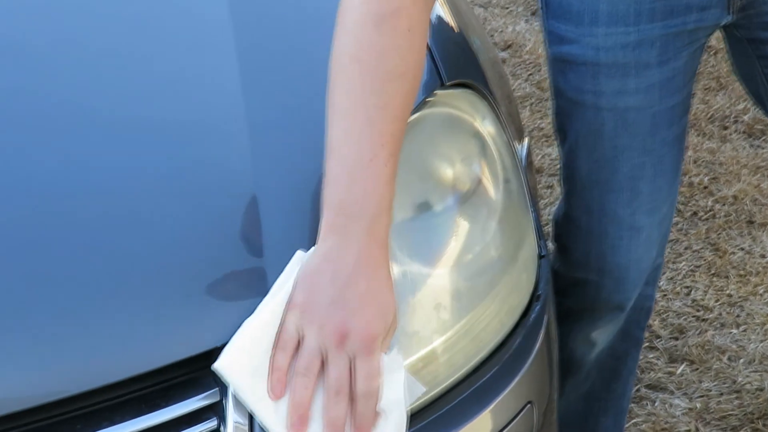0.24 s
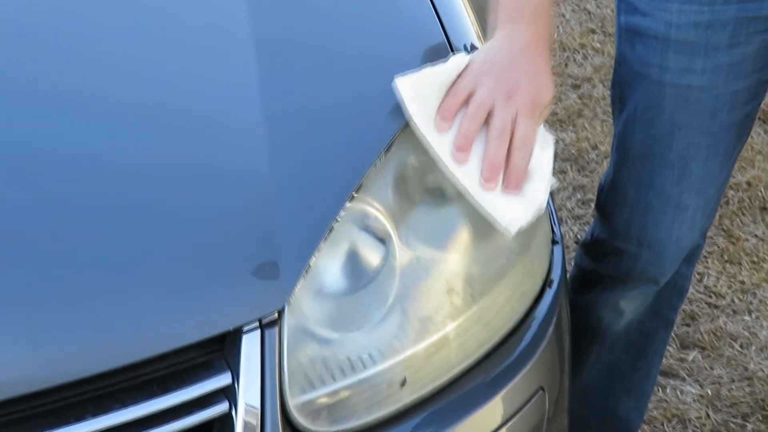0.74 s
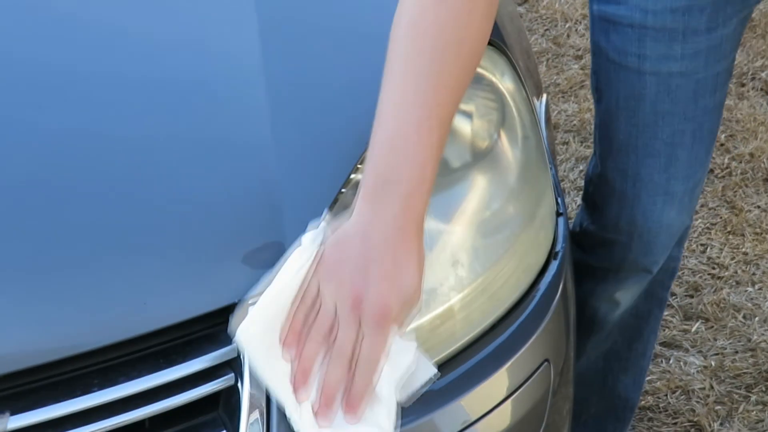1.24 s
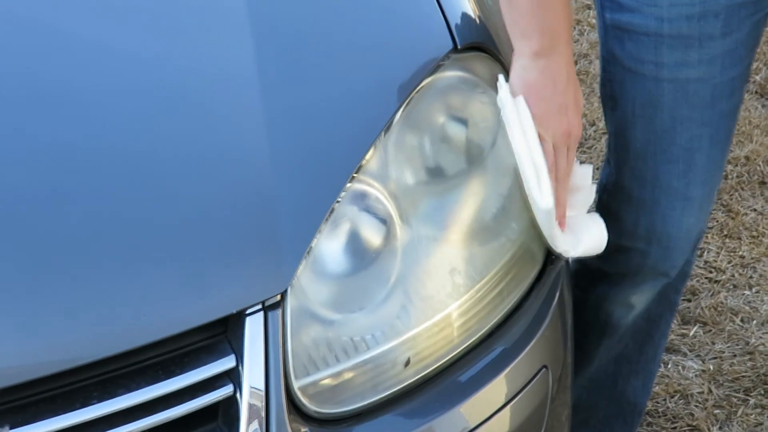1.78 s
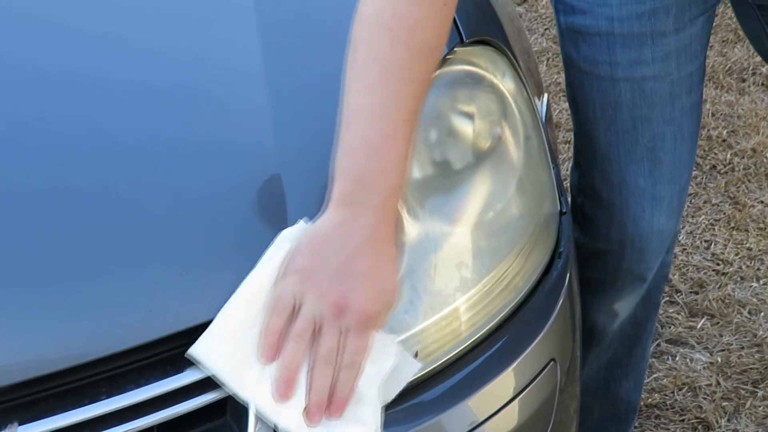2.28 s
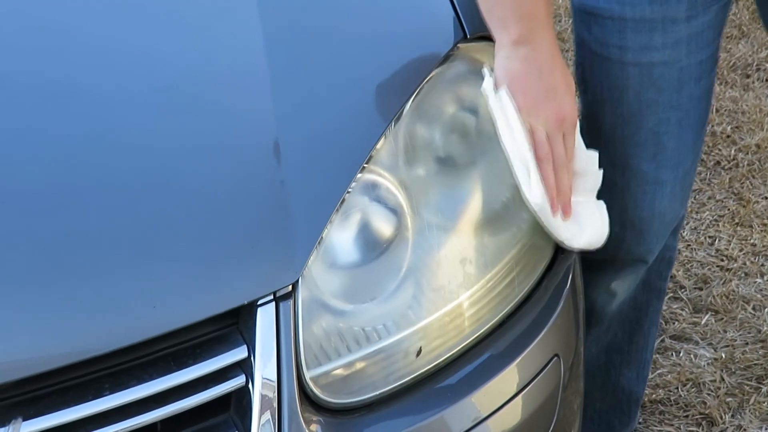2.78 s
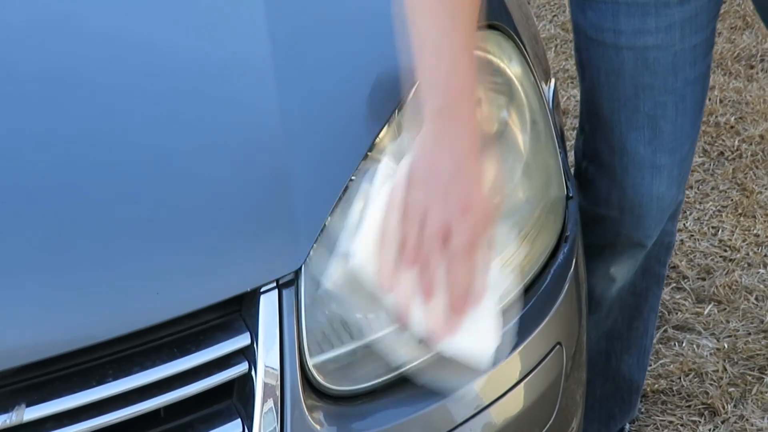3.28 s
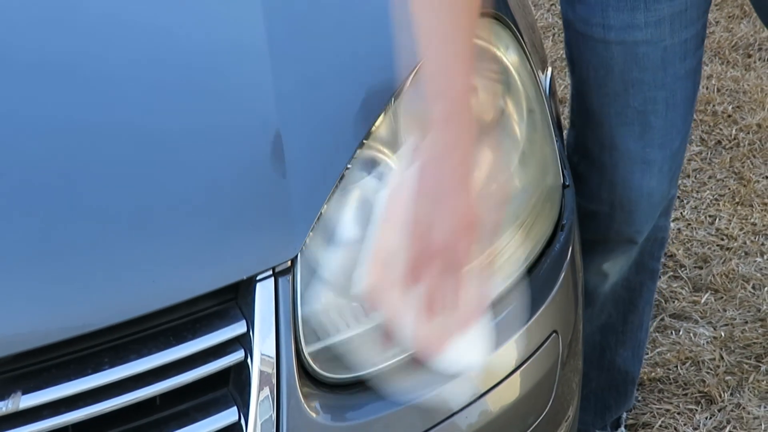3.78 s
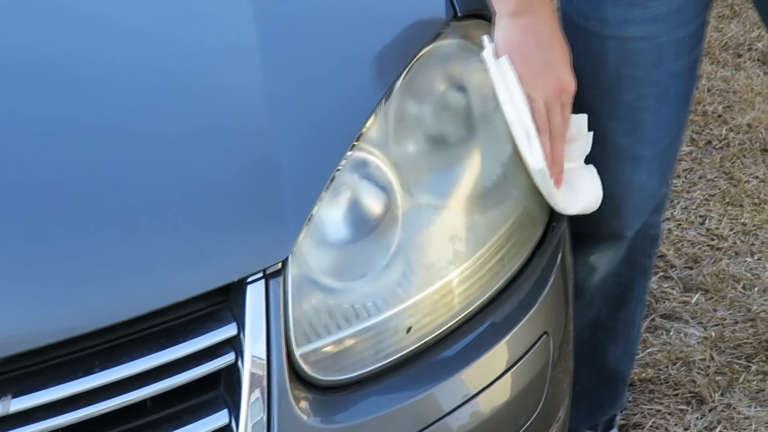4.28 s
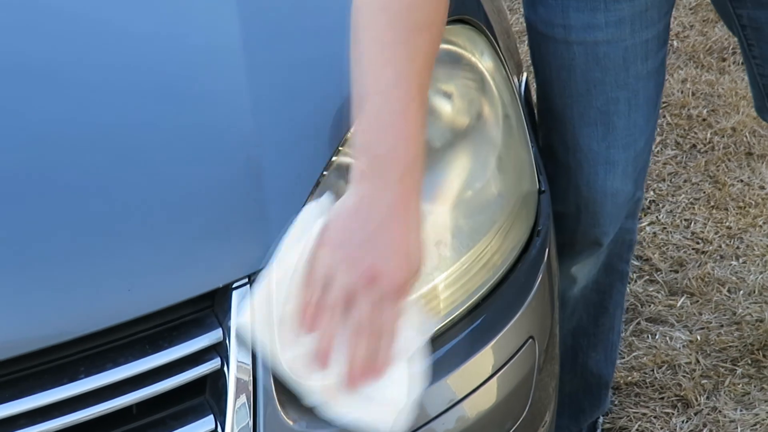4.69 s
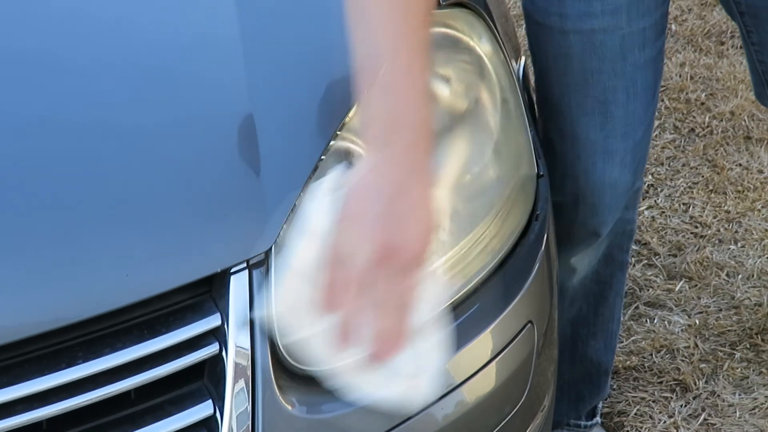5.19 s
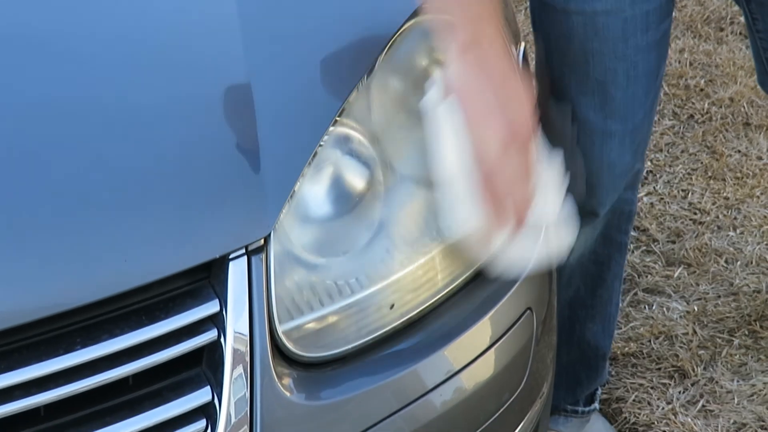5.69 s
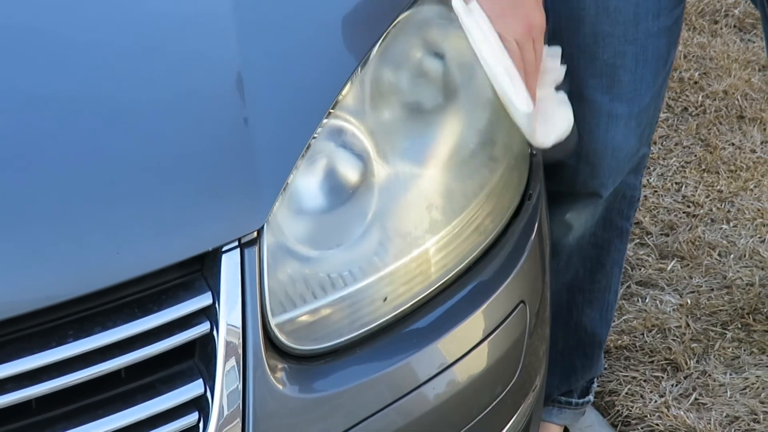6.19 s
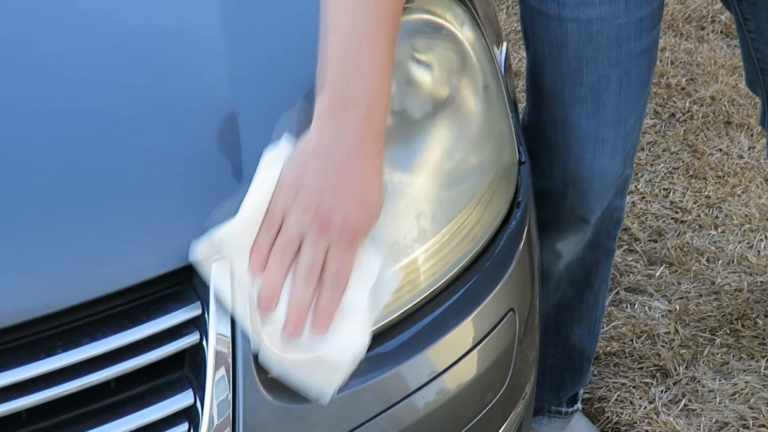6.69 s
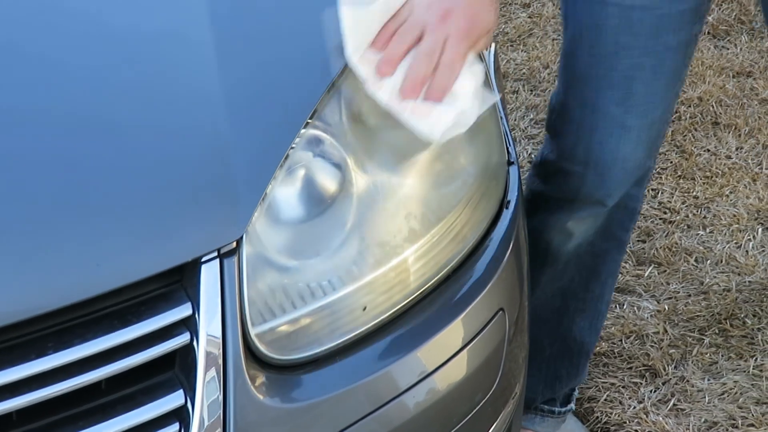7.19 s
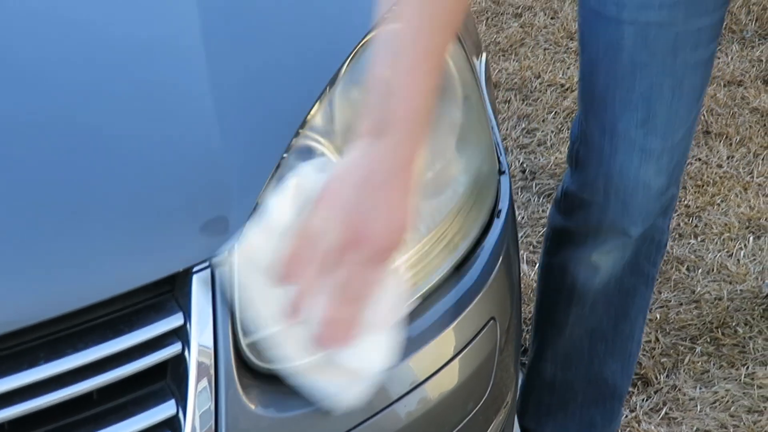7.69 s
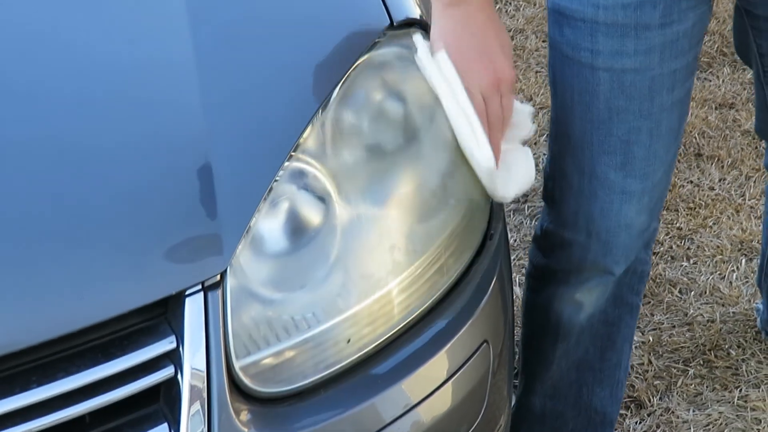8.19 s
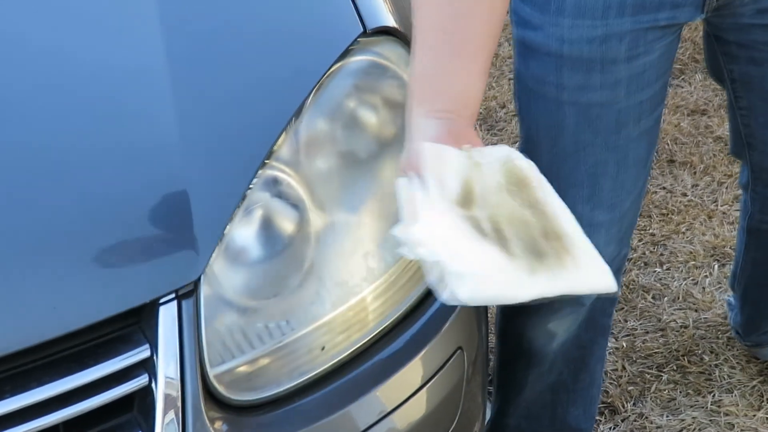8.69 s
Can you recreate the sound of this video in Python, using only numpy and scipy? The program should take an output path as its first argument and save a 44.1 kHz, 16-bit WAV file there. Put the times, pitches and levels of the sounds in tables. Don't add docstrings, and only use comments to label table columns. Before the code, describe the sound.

Dry paper scrubs rhythmically over a hollow plastic lamp lens, with light ticks and faint squeaks, under low, fluttering gusts of wind on the microphone.

```python
import sys
import numpy as np
from scipy import signal
from scipy.fft import rfft, irfft, next_fast_len
from scipy.io import wavfile
from scipy.ndimage import uniform_filter1d

SR = 44100
rng = np.random.default_rng(int(sys.argv[2]) if len(sys.argv) > 2 else 0)


def undo_db(level):
    steps = np.asarray(level, float) / 20
    return 10 ** steps


def persist_wave(psi):
    counts = np.round(np.clip(psi, -1, 1) * 32767).astype(np.int16)
    wavfile.write(sys.argv[1], SR, np.atleast_2d(counts).T)


N = 394606


def curve(table):
    s, *columns = np.transpose(table)
    return [np.interp(np.arange(N) / SR, s, c) for c in columns]


def unit(x):
    return x / np.sqrt(np.mean(x ** 2))


def colour(x, points):
    hz, db = np.transpose(points)
    size = next_fast_len(N)
    f = np.maximum(np.arange(size // 2 + 1) * SR / size, 1)
    gain = undo_db(np.interp(np.log(f), np.log(hz), db))
    return irfft(rfft(x, size) * gain, size)[:N]


def ring(x, hz, width_hz):
    return signal.lfilter(*signal.iirpeak(hz, hz / width_hz, SR), x)


def walk(rate):
    k = int(SR / rate)
    held = np.repeat(rng.standard_normal(N // k + 1), k)
    return unit(uniform_filter1d(uniform_filter1d(held, k), k)[:N])


def grains(rate, spread_db):
    hit = rng.random(N) < rate / SR
    size = np.minimum(rng.exponential(size=N), 3)
    return unit(hit * undo_db(spread_db * size) * rng.standard_normal(N))


def add(out, at_s, burst):
    i = max(int(at_s * SR), 0)
    out[i:i + len(burst)] += burst[:N - i]


def swell(s, length, db, tail=1):
    out = np.zeros(N)
    t = np.arange(max(-2 * length, -s) * SR, 2 * length * tail * SR) / SR
    stretch = np.where(t > 0, tail, 1)
    add(out, s + t[0], undo_db(db) ** 2 * np.exp(-(2 * t / length / stretch) ** 2))
    return out


def dips(rows):
    return undo_db(sum(db * swell(s, length, 0) for s, length, db in rows))


# (start [s], length [s],
# fibre hiss at full speed [dB], share of the stroke at which speed crests [0-1], lens shell [dB])
STROKE_ROWS = [(-0.272, 0.5, -44, 0.61, -47), (0.207, 0.62, -49.5, 0.11, -57.5),
               (0.853, 0.44, -48, 0.21, -55), (1.324, 0.49, -41.5, 0.75, -47.5),
               (1.792, 0.46, -43, 0.39, -55), (2.294, 0.39, -42.5, 0.7, -47.5),
               (2.693, 0.48, -44.0, 0.36, -51), (3.158, 0.38, -43, 0.71, -47),
               (3.519, 0.41, -43.5, 0.39, -49), (3.933, 0.35, -42.5, 0.85, -47),
               (4.288, 0.37, -43, 0.4, -50), (4.657, 0.32, -42, 0.86, -48),
               (4.975, 0.33, -41.5, 0.33, -51.5), (5.298, 0.3, -41.5, 0.59, -46.5),
               (5.582, 0.3, -42, 0.31, -51.5), (5.882, 0.37, -42.5, 0.54, -46),
               (6.179, 0.29, -52, 0.58, -53), (6.389, 0.42, -49.5, 0.53, -54.5),
               (6.808, 0.73, -50, 0.12, -54.5), (7.385, 0.41, -45.5, 0.62, -51.5),
               (7.796, 0.43, -49, 0.18, -57.5), (8.087, 0.1, -46, 0.17, -49),
               (8.02, 0.4, -56.5, 0.55, -56.5), (8.476, 0.186, -69, 0.61, -67)]
# (crest [s], length [s], hiss [dB])
PAPER_DRAGS = [(0.79, .04, -52.5), (0.92, 0.046, -52), (1.196, 0.14, -47.5), (3.59, .04, -60),
               (8.34, 0.071, -52.5), (8.412, 0.026, -58), (8.722, .008, -68), (8.767, .006, -68),
               (8.876, .006, -70)]
# (crest [s], length [s], shell [dB])
RIM_SCRAPES = [(0.41, 0.16, -50.5), (0.777, 0.045, -50.5), (1.228, 0.18, -48.5), (1.738, 0.057, -51),
               (1.971, 0.14, -44), (2.186, 0.099, -52), (2.653, 0.039, -48), (2.871, 0.11, -49),
               (3.105, 0.25, -52.5), (3.698, 0.071, -46.5), (4.46, 0.11, -47.5), (5.104, 0.1, -45.5),
               (5.693, 0.093, -48), (5.951, 0.019, -45), (6.17, 0.042, -51), (6.335, 0.039, -53),
               (6.859, 0.24, -51), (7.568, 0.089, -46.5), (7.917, 0.13, -50)]
# (time [s], length [s], hiss change [dB],
# shell change [dB])
BRIEF_DIPS = [(0.234, 0.017, -10, -14), (0.28, 0.12, -13, 2), (5.303, 0.014, 4, -9), (0.86, .025, -6, 2),
              (1.327, 0.028, -12, -14), (2.694, 0.027, -2, -6), (3.148, 0.03, -8, -10),
              (3.52, 0.03, -27, -6), (6.82, 0.038, 3, -13), (7.392, .06, -2, -5), (8.367, .035, -6, -2.5),
              (2.242, 0.022, -1, -8), (4.274, .014, -6, -2), (5.0, .06, -1, -0.5), (5.601, .014, -6, -14),
              (6.23, 0.033, -3, -6), (7.8, .03, 6, -1), (3.14, 0.011, -7, 0), (3.1, 0.054, -2, -3.5),
              (1.5, .012, 0, -9), (4.4, .012, 0, -8), (2.3, .05, -1, -4), (3.535, .03, -1, -5),
              (1.825, .02, -1, -3), (.19, .06, .5, -2.5), (3.7, .05, 0, -2)]
PICKUP, GRIP = (0.4, 2.53), (0.93, 1.59)
STOP = (2.66, 4.8)
HISS_CREEP_DB, SHELL_CREEP_DB = -74, -70.5
SHELL_BY_SPEED, SHELL_RISE_DB = 0.28, 3.5


def hand():
    hiss = sum(swell(*row) for row in PAPER_DRAGS) + undo_db(HISS_CREEP_DB) ** 2
    shell = sum(swell(*row) for row in RIM_SCRAPES) + undo_db(SHELL_CREEP_DB) ** 2
    for k, (s, length, hiss_db, crest, shell_db) in enumerate(STROKE_ROWS):
        up = k % 2
        part = np.arange(max(-s, 0) * SR, length * SR) / (length * SR)
        rising = (1 - np.clip(1 - part / crest, 0, 1) ** PICKUP[up]) ** GRIP[up]
        halting = 1 - np.clip((part - crest) / (1 - crest), 0, 1) ** STOP[up]
        speed = rising * halting
        add(hiss, s, (undo_db(hiss_db) * speed) ** 2)
        shell_level = undo_db(shell_db + SHELL_RISE_DB * (part - 0.5))
        add(shell, s, (shell_level * speed ** SHELL_BY_SPEED) ** 2)
    hiss_dips = dips((s, length, db) for s, length, db, _ in BRIEF_DIPS)
    shell_dips = dips((s, length, db) for s, length, _, db in BRIEF_DIPS)
    return np.sqrt(hiss) * hiss_dips, np.sqrt(shell) * shell_dips


# (frequency [Hz], density [dB per Hz])
FIBRE_COLOUR = [(2060, -75), (3500, -6), (4380, -5), (5030, -5), (7310, -2.5), (12100, 2), (13400, 1),
                (15500, -10.5)]
# (frequency [Hz], width [Hz], level [dB])
LENS_MODES = [(1544, 214, -1.5), (2236, 460, 2), (2777, 704, 4), (3345, 1145, -1)]
# (frequency [Hz], width [Hz], level [dB])
PAPER_TONES = [(1230, 60, -9), (1898, 87, -9), (3037, 52, -9), (4270, 135, -15), (4760, 120, -18.5)]
PATCHY_DB = 0.7


def rubbing(hiss_gain, shell_gain):
    catches = grains(24000, spread_db=0.5) * undo_db(0.5 * walk(90) + 0.5 * walk(17))
    shell = np.zeros(N)
    for k, (hz, width_hz, db) in enumerate(LENS_MODES):
        shell -= (-1) ** k * undo_db(db + PATCHY_DB * walk(13)) * ring(catches, hz, width_hz)
    for hz, width_hz, db in PAPER_TONES:
        shell += undo_db(db + 3.5 * walk(30)) * ring(catches, hz, width_hz)
    hiss = unit(colour(catches, FIBRE_COLOUR))
    return undo_db(0.94) * hiss_gain * hiss + shell_gain * undo_db(1.03 + 0.9 * walk(25)) * unit(shell)


# (time [s], level [dB])
HAND_WEIGHT = [(.9, -62), (1.4, -53.5), (2, -60), (3, -50.5), (3.67, -51), (4.5, -52), (6.3, -53.5),
               (7.1, -59), (7.5, -55), (8.5, -52.5)]
# (crest [s], length [s], level [dB])
HARD_LEANS = [(1.361, 0.025, -48), (1.72, .08, -55), (1.979, 0.15, -49), (2.202, 0.055, -48.5),
              (2.605, 0.045, -47.5), (2.826, 0.066, -52.5), (3.664, 0.018, -41), (4.402, 0.054, -48),
              (6.34, 0.18, -50.5), (6.54, 0.034, -58), (6.758, 0.025, -50), (6.832, 0.022, -43.5),
              (7.513, 0.032, -47.5), (8.45, 0.011, -51.5), (5.354, .08, -54), (3.826, .06, -56)]


def housing(shell_gain):
    drag = grains(3000, spread_db=1.5) * undo_db(1.2 * walk(20))
    steady = undo_db(curve(HAND_WEIGHT)[0] + 29.5) * shell_gain ** 0.66
    gain = np.sqrt(steady ** 2 + sum(swell(*row) for row in HARD_LEANS))
    return gain * unit(ring(drag, 745.0, 540.0) - ring(drag, 955.0, 800.0))


# (time [s], peak [dB], ring [Hz], t60 [s], snap [dB])
TRIM_TICKS = [(3.637, -47, 1770, 0.05, 1), (6.638, -26, 1020, 0.07, 10), (6.75, -36, 2800, 0.15, 6),
              (6.8255, -26.5, 1760, 0.11, 7), (6.829, -32, 2900, .12, 3), (6.838, -34, 1000, 0.07, 10),
              (7.521, -27, 2860, 0.04, 6), (8.4425, -39.5, 1450, 0.045, 2), (8.5495, -32, 1620, 0.035, 1),
              (1.372, -42, 1500, .03, -3), (8.92, -55, 3500, .06, 2)]


def ticks():
    out, t = np.zeros(N), np.arange(int(0.08 * SR)) / SR
    for s, db, hz, t60, snap_db in TRIM_TICKS:
        rattle = rng.standard_normal(len(t)) * np.exp(-np.log(1000) * t / t60)
        rattle[:6] += 7.5
        snap = ring(ring(rattle, 1900.0, 3200.0), 1900.0, 3200.0)
        burst = undo_db(14.5) * ring(rattle, hz, 200.0) + undo_db(snap_db) * snap
        add(out, s, undo_db(db) * burst / np.abs(burst).max())
    return out


# (start [s], length [s], from [Hz], to [Hz], level [dB])
PAPER_SQUEAKS = [
    (1.92, .12, 790, 930, -59),
    (2.175, .145, 905, 865, -58.5),
    (3.075, .055, 1330, 1430, -52),
    (3.135, .065, 1450, 1330, -50.5),
    (3.075, .03, 1215, 1195, -55),
    (3.065, .055, 1810, 1815, -51.5),
    (1.452, .02, 2800, 3000, -52),
    (1.395, .022, 4200, 4250, -55),
    (4.275, .065, 2350, 2345, -56),
]


def squeaks():
    out, waver = np.zeros(N), 1 + 0.013 * walk(90)
    for s, length, from_hz, to_hz, db in PAPER_SQUEAKS:
        n = int(length * SR)
        hz = np.linspace(from_hz, to_hz, n) * waver[int(s * SR):][:n]
        tone = np.sqrt(2) * np.sin(2 * np.pi * np.cumsum(hz) / SR)
        add(out, s, undo_db(db) * tone * np.hanning(n) ** 0.5)
    return out * undo_db(2.5 * walk(70))


# (time [s], level [dB])
TOWEL_SWING = [(8.6, -75), (8.64, -62), (8.65, -46), (8.66, -46), (8.672, -48), (8.7, -45.5), (8.718, -47),
               (8.726, -55), (8.8, -63), (8.95, -67)]


def flap():
    gate = np.arange(N) / SR > TOWEL_SWING[0][0]
    puff_colour = [(300, -19), (480, -2), (700, 0), (980, -9.5), (1200, -25), (2500, -56)]
    puff = unit(colour(rng.standard_normal(N), puff_colour))
    return gate * undo_db(curve(TOWEL_SWING)[0] + 1.2 * walk(60)) * puff


# (time [s], level [dB])
BREEZE_FLOW = [(0.0, -34.5), (0.6, -37), (1.19, -56), (1.79, -49), (2.39, -50.5), (2.98, -62), (3.58, -51),
               (4.18, -36), (4.77, -50.5), (5.37, -50.5), (5.97, -46), (6.56, -68), (7.16, -36),
               (7.76, -59), (8.35, -47), (8.95, -64)]
# (crest [s], length [s], level [dB], small eddies minus large [dB])
GUST_ROWS = [(0.153, 0.089, -21.5, -1.5), (0.281, 0.05, -27, 9.5), (0.483, 0.055, -29.5, 6.5),
             (0.684, 0.034, -26, 8.5), (0.766, 0.017, -30.5, 8), (1.278, 0.027, -31.5, -9.5),
             (1.928, 0.044, -31.5, -13), (2.529, 0.027, -32, -7.5), (3.528, 0.034, -39.5, -5),
             (3.771, 0.04, -38, 1.5), (3.916, 0.045, -28.5, 0.2), (4.152, 0.0077, -26.5, -9),
             (4.207, 0.029, -26, -6.5), (4.294, 0.079, -36, -8), (4.467, 0.035, -31.5, -7),
             (4.763, 0.079, -39, -14.5), (5.03, 0.023, -31.5, 0), (5.417, 0.05, -38, -14),
             (5.963, 0.088, -43.5, -10), (6.225, 0.047, -29, 0.8), (6.407, 0.011, -33, 3),
             (6.47, 0.12, -32, -0.5), (6.677, 0.086, -30, -3), (6.888, 0.071, -63, 23.5),
             (7.292, 0.032, -38, -2), (7.53, 0.026, -41, 0), (7.664, 0.037, -37.5, -19),
             (8.169, 0.043, -35.5, -10), (8.45, 0.013, -37.5, -2.5), (8.539, 0.023, -34.5, -8)]
# (crest [s], level [dB], small eddies minus large [dB])
PUFF_ROWS = [(0.066, -31, -21), (0.113, -25, -5), (0.364, -33, 3), (0.422, -35.5, 8), (0.62, -28.5, 6),
             (0.84, -33.5, -2.5), (0.961, -40, -8), (1.091, -44, -15), (1.388, -44, -12), (1.732, -47, -22),
             (2.088, -39.5, -20), (2.326, -52, -16), (3.04, -49.5, -6), (3.428, -47, -14),
             (3.668, -40, -14), (3.996, -38, -2), (4.088, -36.5, -13), (5.102, -34, -4.5),
             (5.233, -34.5, -8.5), (6.168, -32, 0.5), (6.315, -32.5, -3), (6.613, -37.5, 5.5),
             (6.745, -30.5, -7), (6.85, -35.5, -2), (6.934, -33.5, -1), (7.15, -44, 1), (7.212, -45, 3),
             (7.61, -43, -11), (7.852, -47, -6.5), (8.375, -62, -6)]
BREEZE_LULL_DB, BREEZE_SMALL_DB = 2.5, -14
GUST_TAIL, PUFF_S = 1.4, 0.062


def gusts():
    large = undo_db(curve(BREEZE_FLOW)[0] + BREEZE_LULL_DB * walk(23)) ** 2
    small = large * undo_db(BREEZE_SMALL_DB) ** 2
    pushes = [(*row, GUST_TAIL) for row in GUST_ROWS]
    pushes += [(s, PUFF_S, db, small_db, 1) for s, db, small_db in PUFF_ROWS]
    for s, length, db, small_db, tail in pushes:
        push = swell(s, length, db, tail)
        large = large + push
        small = small + push * undo_db(small_db) ** 2
    return np.sqrt(large), np.sqrt(small)


# (frequency [Hz], density [dB per Hz])
LARGE_EDDY = [(15, -50), (30, -15), (60, 13), (120, 15.5), (200, 8), (300, -7), (500, -40)]
LITTLE_EDDY = [(80, -31), (150, 8.5), (240, 14), (310, 10), (450, 3.5), (520, -10), (650, -17), (1000, -70)]
FINE_PLUME = [(300, -18), (550, 7.5), (800, 2), (1300, -9), (2000, -21.5), (4000, -39)]
# (time [s], length [s], level change [dB])
FLOW_CHANGES = [(.24, 0.024, -3), (.44, 0.018, -8), (.82, 0.015, -11), (1.62, 0.074, -8), (1.84, .05, -6),
                (2.27, .03, -2), (2.75, .08, -7), (3.86, .03, 4), (3.98, 0.013, -7), (4.05, 0.025, -7),
                (5.25, 0.025, -22), (5.54, 0.083, -6), (5.66, 0.033, -11), (6.06, 0.034, -4), (6.36, 0.03, 0),
                (6.945, 0.019, -14), (7.0, .05, -3), (7.11, 0.075, -12), (7.42, 0.071, 4), (8.05, 0.089, -8),
                (8.49, .03, -5)]
# (peak [s], peak [dB], frequency [Hz])
STRONG_BUFFETS = [(0.092, -9, 204), (0.169, -5, 205), (0.184, -6, 203), (0.266, -4.5, 246),
                  (0.291, -1.5, 278), (0.306, -2, 338), (0.469, -11, 228), (0.485, -6, 304),
                  (0.506, -8, 266), (0.522, -3, 257), (0.663, -9, 285), (0.684, -4, 300),
                  (0.709, -10.5, 234), (0.837, -16.5, 263), (0.969, -25, 250), (3.666, -28, 246),
                  (3.997, -19.5, 232), (4.014, -18.5, 191), (4.075, -21.5, 156), (4.158, -7, 198),
                  (4.215, -14.5, 222), (4.474, -18, 209), (5.026, -12, 175), (6.2418, -10, 215),
                  (6.416, -11, 174), (6.482, -12.5, 219), (6.851, -27, 250), (6.962, -18, 232),
                  (7.136, -22, 176), (7.292, -19, 195)]
# (peak [s], peak [dB], frequency [Hz])
MORE_BUFFETS = [(0.053, -18.5, 175), (0.109, -9, 153), (0.131, -16, 212), (0.148, -11.5, 246),
                (0.157, -12, 183), (0.205, -14, 322), (0.228, -12, 286), (0.248, -15, 247),
                (0.277, -9.5, 326), (0.363, -14.5, 342), (0.38, -16, 317), (0.398, -24, 250),
                (0.421, -19, 142), (0.59, -10.5, 325), (0.604, -14, 335), (0.614, -11, 302),
                (0.626, -10, 268), (0.636, -7, 282), (0.651, -17, 306), (0.771, -18, 225),
                (0.792, -20, 202), (1.281, -28, 168), (1.928, -27, 110), (1.955, -22.5, 159),
                (2.293, -34.5, 134), (2.525, -20.5, 190), (3.78, -19.5, 133.2), (3.901, -27, 253),
                (3.913, -27, 242), (3.928, -17, 233), (3.942, -16, 258), (4.29, -17, 157),
                (4.747, -36, 150), (5.093, -20, 191), (5.214, -31, 123), (5.981, -25.5, 204),
                (6.146, -21, 170), (6.167, -22, 137), (6.404, -17, 123), (6.429, -15, 227.4),
                (6.538, -17.5, 152), (6.597, -18.5, 188), (6.61, -18, 210), (6.624, -18, 230),
                (6.664, -22, 123), (6.7, -17, 146), (6.719, -23, 227), (6.73, -15.5, 219),
                (6.761, -18, 227), (6.771, -21, 148), (6.835, -23, 291), (6.87, -24, 294),
                (6.913, -23, 151), (6.929, -19.5, 199), (7.536, -24.5, 210), (7.603, -26.5, 161),
                (8.147, -26.5, 156), (8.162, -33, 156), (8.448, -30, 185), (8.545, -27, 110)]
# (peak [s], peak [dB], frequency [Hz])
FURTHER_SWIRLS = [(0.102, -9, 263), (.163, -13, 300), (1.364, -33, 425), (1.401, -37, 129), (2.062, -34, 172),
                  (2.182, -35, 405), (2.341, -34, 167), (2.536, -25, 188), (3.52, -36, 135), (3.74, -30, 300),
                  (3.764, -25, 336), (3.785, -25.5, 357), (.677, -6, 300), (.196, -15, 100),
                  (2.966, -36, 156), (3.414, -37, 151), (3.811, -25, 199), (3.948, -26, 250),
                  (4.457, -26, 167), (4.527, -28, 124), (5.123, -24, 178), (5.402, -31, 183),
                  (5.421, -31, 172), (5.435, -28.5, 129), (5.952, -25.5, 161), (6.211, -18, 229),
                  (6.31, -23, 124), (6.346, -28, 151), (6.824, -25, 156), (7.162, -28, 172), (7.2, -28, 210),
                  (7.207, -25, 183), (7.302, -27, 188), (7.316, -28, 102), (7.413, -34, 199),
                  (7.671, -24.5, 145), (8.178, -31, 167), (8.193, -32, 140), (8.531, -36, 220),
                  (8.446, -36, 300), (3.885, -27, 330), (3.935, -26, 400), (1.278, -31, 260)]
# (time [s], level [dB])
FLOW_TEAR = [(0, -2), (.23, -5.5), (.3, 5.5), (.4, 7.5), (.54, -4), (.6, 6.5), (.7, -4), (3.75, -10),
             (3.92, 4), (4.1, -16), (6.3, 6.5), (7, -2), (8.95, -5)]
CLEARING_DB = -5
CAVITY_HZ, CAVITY_WIDTH_HZ, CAVITY_DB = 440, 72, -6


def wind():
    large_gain, small_gain = gusts()
    large = unit(colour(grains(900, spread_db=3.5), LARGE_EDDY)) * undo_db(0.37 * walk(30))
    small = unit(colour(grains(1500, spread_db=0.9), LITTLE_EDDY)) * undo_db(0.62 * walk(45))
    flow = undo_db(-3.0) * dips(FLOW_CHANGES) * (large_gain * large + undo_db(2.1) * small_gain * small)

    single, clearing = np.zeros(N), np.zeros(N)
    for s, db, hz in list(STRONG_BUFFETS) + list(MORE_BUFFETS) + list(FURTHER_SWIRLS):
        t = np.arange(int(2.6 * SR / hz)) / SR - 1.24 / hz
        bell = np.hanning(len(t))
        add(clearing, s + t[0], bell)
        add(single, s + t[0], undo_db(db - 4.0) * bell ** 1.74 * np.cos(2 * np.pi * hz * t))
    flow = flow * undo_db(CLEARING_DB * np.minimum(clearing, 1)) + single
    flow = flow + undo_db(CAVITY_DB) * ring(flow, CAVITY_HZ, CAVITY_WIDTH_HZ)

    force = np.sqrt(uniform_filter1d(flow ** 2, 900) + 1e-12)
    fine_gain = undo_db(curve(FLOW_TEAR)[0] - 17.0) * force ** 1.45
    plume, apart = (fine_gain * unit(colour(rng.standard_normal(N), FINE_PLUME)) for _ in range(2))

    uneven = np.roll(flow, 160) * force ** 0.62 - 0.19 * flow
    uneven = colour(uneven, [(30, -34), (60, -14), (125, -22), (250, -15), (450, -12.5), (800, 13)])
    side = undo_db(-6.5) * apart + uneven
    bent = 0.2 * colour(flow ** 2, [(40, -26), (200, 8), (900, 2.5), (2000, -45)])
    return flow + plume + bent, side


# (frequency [Hz], density [dB per Hz])
FAR_COLOUR = [(30, 1), (243, -7.5), (333, -3.5), (492, -3.5), (547, -9.5), (607, -7), (710, -6.5),
              (1020, -9.5), (5500, -31.5), (15500, -49)]
OUTDOORS_DB = -52


def outdoors():
    mid, side = (colour(rng.standard_normal(N), FAR_COLOUR) for _ in range(2))
    gain = undo_db(OUTDOORS_DB - 2.0 + 1.0 * walk(3.19)) / np.std(mid)
    width = [(100, -74), (700, -25.5), (3000, 4.0), (12000, 13), (15500, 15)]
    return gain * mid, gain * colour(side, width)


# (frequency [Hz], level [dB])
PORT_WIDTH = [(300, -46), (1000, -30), (2500, -27), (3800, -20), (5200, -11), (7000, -1.5), (9000, -9.5),
              (15000, -6.5)]
NOTCH_HZ, NOTCH_WIDTH_HZ, NOTCH_DEPTH = 8650, 210, 0.23


def port_difference(car, gains):
    lag = np.imag(signal.hilbert(car, next_fast_len(N))[:N])
    spread = 0.33 * lag + 0.08 * car + 0.78 * rubbing(*gains)
    side = colour(spread, PORT_WIDTH)
    return side - NOTCH_DEPTH * ring(side, NOTCH_HZ, NOTCH_WIDTH_HZ)


def scene():
    gains = hand()
    car = rubbing(*gains) + housing(gains[1]) + ticks() + squeaks() + flap()
    air, air_side = wind()
    far_mid, far_side = outdoors()
    mid = car + air + far_mid
    side = port_difference(car, gains) + air_side + far_side
    return np.array([mid + side, mid - side])


def low_pass(x):
    return signal.sosfilt(signal.butter(12, 15830, fs=SR, output="sos"), x)


def record(dry):
    limit, capsule_db = 0.75, -75
    mix = dry / (1 + (dry / limit) ** 4) ** 0.25
    mix = mix + undo_db(capsule_db) * rng.standard_normal(dry.shape)
    mix = signal.sosfilt(signal.ellip(10, 0.3, 50, 15810, fs=SR, output="sos"), mix)
    return low_pass(mix)


dry = scene()
out = record(dry)
persist_wave(out)
```